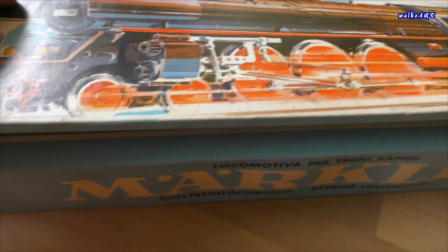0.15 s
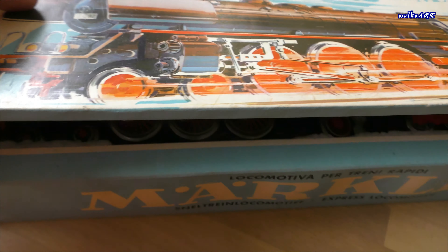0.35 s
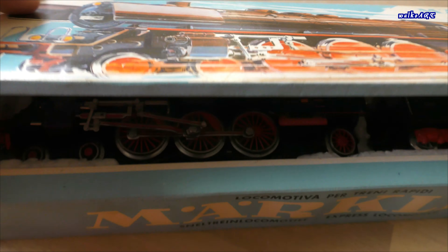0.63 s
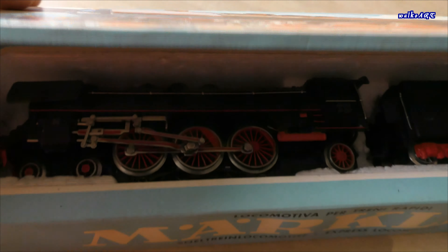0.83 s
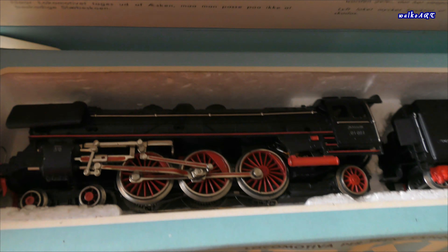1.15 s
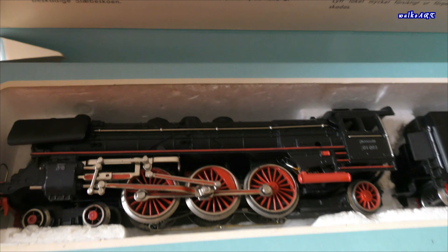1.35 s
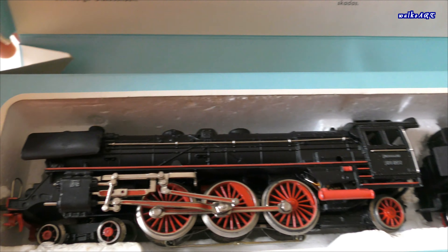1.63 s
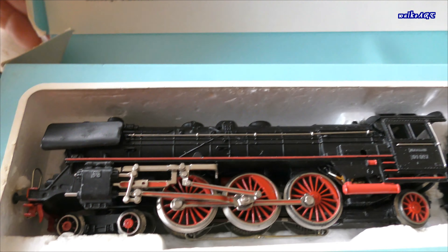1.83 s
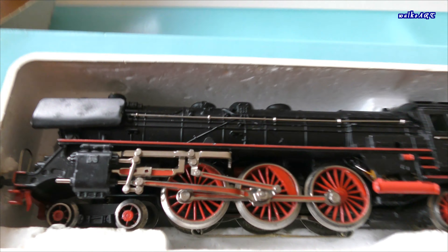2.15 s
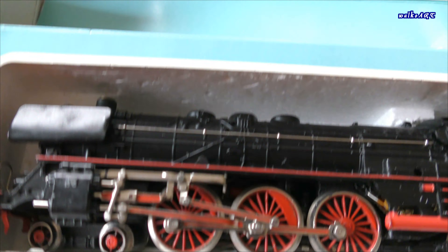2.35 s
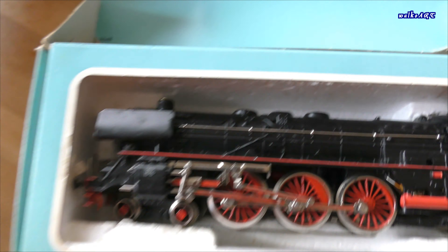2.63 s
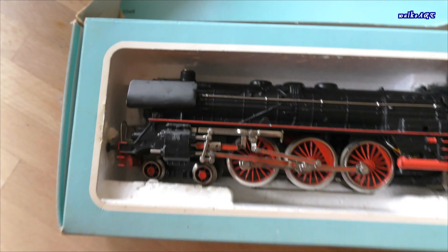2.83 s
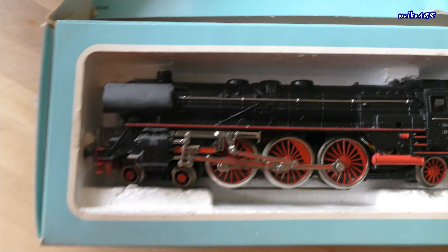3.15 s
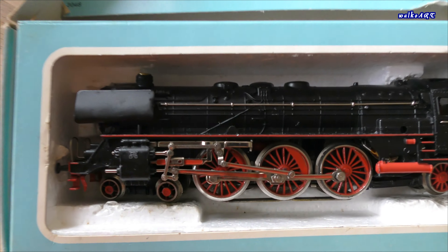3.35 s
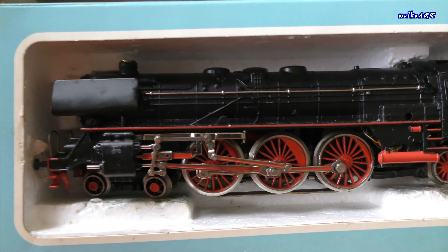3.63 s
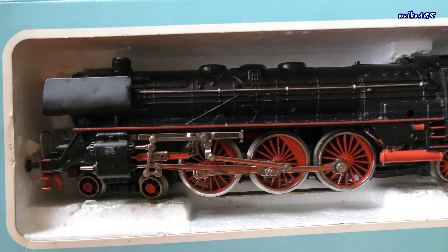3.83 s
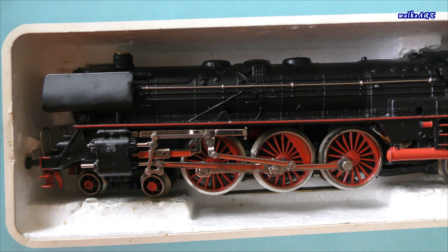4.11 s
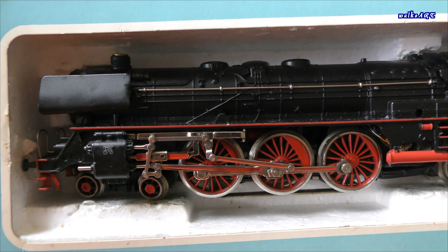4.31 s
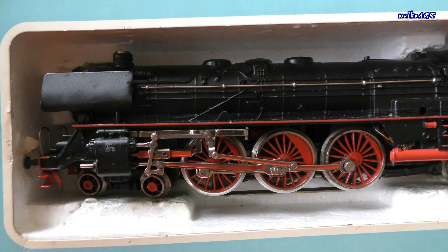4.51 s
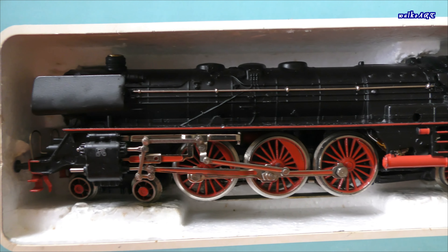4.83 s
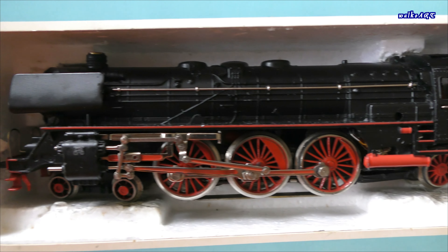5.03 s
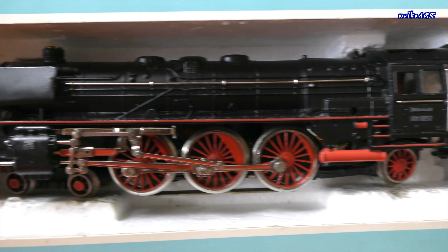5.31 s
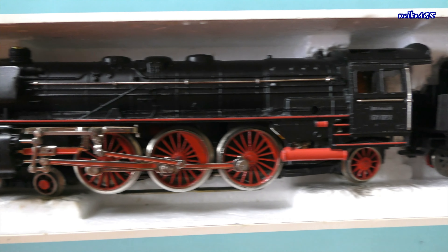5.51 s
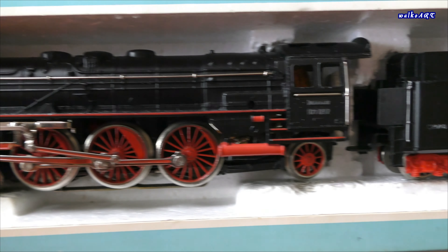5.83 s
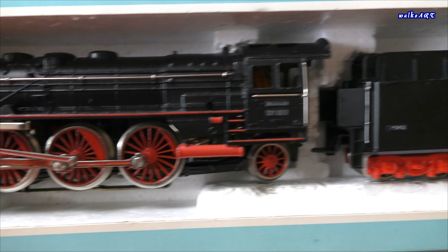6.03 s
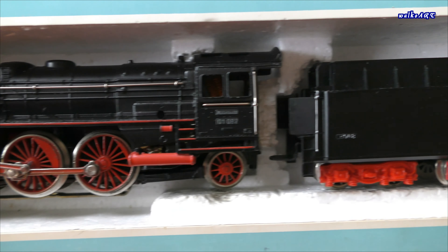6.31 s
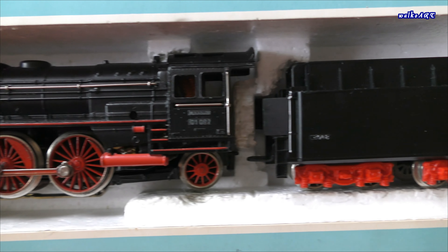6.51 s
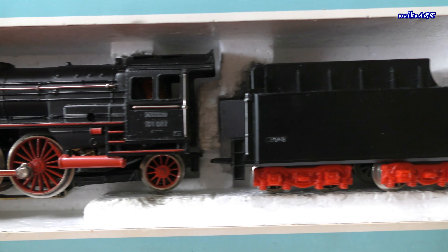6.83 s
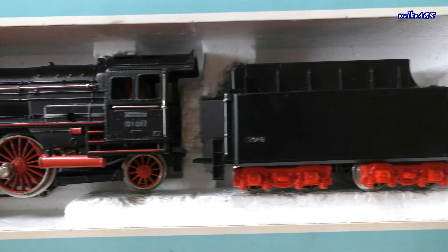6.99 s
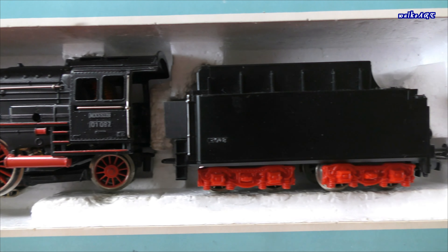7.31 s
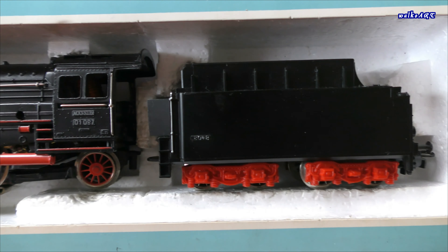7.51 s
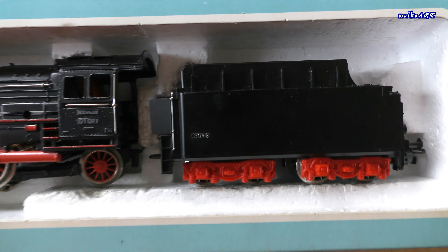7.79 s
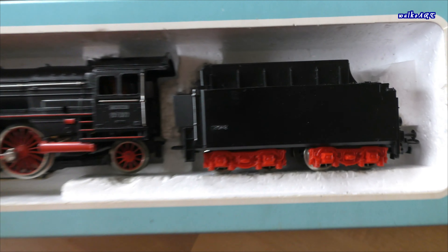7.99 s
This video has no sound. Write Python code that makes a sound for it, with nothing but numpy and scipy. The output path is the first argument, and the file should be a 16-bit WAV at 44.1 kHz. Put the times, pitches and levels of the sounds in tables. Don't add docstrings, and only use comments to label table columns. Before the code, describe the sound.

A cardboard lid rubs and rasps off its box, pops free with a sharp crack, scrapes, then light clicks and taps follow in a quiet room.

```python
import sys
import numpy as np
from scipy import signal
from scipy.fft import rfft, irfft
from scipy.io import wavfile
from scipy.ndimage import uniform_filter1d

SR = 44100
rng = np.random.default_rng(int(sys.argv[2]) if len(sys.argv) > 2 else 0)


def store_wav(level_fs):
    pcm = np.round(np.clip(np.atleast_2d(level_fs), -1, 1) * 32767)
    wavfile.write(sys.argv[1], SR, pcm.T.astype(np.int16))


def magnitude_from_level(level_db):
    exponent = np.asarray(level_db, float) / 20
    return 10 ** exponent


N = 359415
HZ = np.fft.rfftfreq(512, 1 / SR)
FRAMES = np.arange(N // 128 + 5) * 128 / SR

# f/Hz, level/dB per Hz
BOARD_SPECTRUM = [(260, -38), (450, 11.5), (478, 3), (530, -2), (589, -10), (1020, 1), (1440, -2),
                  (1600, -3), (2040, -12.5), (3230, -9), (4300, -13.5), (7030, -13.5), (8670, -14.5),
                  (13600, -14.5), (16000, -14)]
# f/Hz, left-right likeness
NEAR_LIKENESS = [(60, 0.45), (180, 0.17), (550, 0.91), (1650, 0.57), (4970, 0.49), (15000, 0.69)]
# t/s, pressure level/dB, speed as rasp over rub level/dB
NUDGE = [
    (0.0, -58.5, -16.5),
    (.196, -46.5, -6),
    (.254, -56, -12.5),
    (.3, -59.5, -11.5),
]
LIFT = [
    (.512, -58.5, -14),
    (.626, -55.5, -9.5),
    (.86, -56.5, -6),
    (1.03, -49, -1),
    (1.1, -52.5, 2),
    (1.138, -47, -3),
    (1.2, -48.5, 4.5),
    (1.255, -50.5, -2),
]
STRAIN = [
    (1.283, -46, 8),
    (1.31, -40, -4),
    (1.345, -53.5, 7),
    (1.372, -59.5, 6),
]
SWING = [
    (1.39, -44, -6),
    (1.43, -51.5, -2.5),
    (1.55, -55.5, 3.5),
    (1.776, -52.5, -7.5),
    (1.88, -47, -3),
    (2.03, -51.5, -4.5),
    (2.134, -51.5, 4.5),
    (2.31, -45.5, -10),
    (2.4, -44, -12.5),
]
REST = [
    (2.46, -57, -1),
    (2.6, -60, -11.5),
    (2.66, -56, -9),
    (2.97, -63, -6.5),
    (3.04, -60.5, -3),
    (3.3, -65.5, -9.5),
    (3.55, -61, -14),
    (3.85, -70, -9),
    (4.2, -60, -22),
]
# t/s, half length/s, level/dB
BRUSHES = [
    (0.276, 0.0082, -48.5),
    (0.879, 0.0062, -47.5),
    (2, .015, -53),
    (1.885, .05, -63),
    (3.01, 0.031, -62),
    (4.144, 0.022, -59.5),
    (5.141, 0.015, -57),
    (6.16, 0.038, -56),
    (7.166, 0.067, -62.5),
]


def slide():
    z = pair(NEAR_LIKENESS, 3.2)
    t = FRAMES[:z.shape[2]]
    rub_db, speed_db = columns([NUDGE, LIFT, STRAIN, SWING, REST], t)
    press, quick = rub_db + 50, speed_db + 5
    rasp_db = rub_db + speed_db
    fizz_db = -58.5 + 0.63 * press + 0.95 * quick
    flap_hz = 2270 - 8 * press + 13 * quick
    board_db = read(BOARD_SPECTRUM, HZ)

    flap = .6 + 2.26 / (1 + ((HZ[:, None] - flap_hz) / 240) ** 2)
    flap = flap * shaped(board_db, 443, 3940)
    flap = flap * np.sqrt(np.mean(shaped(board_db, 500, 3200) ** 2) / np.mean(flap ** 2, 0))
    rim_db = 20 * np.log10(1 + 0.76 / (1 + ((HZ - 4280) / 410) ** 2))
    rasp = shaped(board_db + rim_db, 1650, 5500)
    fizz = shaped(board_db, 5200, 14000)
    colour = np.sqrt((flap * magnitude_from_level(rub_db)) ** 2 + (rasp * magnitude_from_level(rasp_db)) ** 2 + (fizz * magnitude_from_level(fizz_db)) ** 2)

    fade = np.clip((REST[-1][0] - t) / 0.33, 0, 1)
    brush = sum(magnitude_from_level(db) * np.exp(-((t - s) / half) ** 2) for s, half, db in BRUSHES)
    colour = np.hypot(colour * fade, brush * shaped(board_db, 1260, 3900))
    judder = patches((1, len(t)), 1, 3)
    colour = colour * magnitude_from_level(0.79 * patches(z[0].shape, 8, 12) + 1.16 * judder)
    return sound(z * colour * magnitude_from_level(np.array([.4, -.4]))[:, None, None])


# f/Hz, level/dB, decay t60/s
MAIN_MODES = [(2097, 4.5, 0.024), (1776, -1.5, 0.022), (2490, -5, 0.018), (2770, -14.5, 0.015)]
LOW_MODES = [(944, -0.5, 0.038), (1214, 0.5, 0.028), (1082, -6, 0.024), (1380, -3.5, 0.023)]
UPPER_MODES = [(4165, -4.5, 0.012), (4810, 4, 0.0048), (3236, 0.5, 0.006), (5980, -1.5, 0.0041)]
# f/Hz, level/dB, decay t60/s
WALL_MODES = [(480, 0, 0.052), (453, -6.5, 0.026)]
# t/s, strength level/dB, dullness (low over main modes)/dB,
# sharpness (upper modes)/dB, edge (tilt of upper modes)/dB per half octave
NICKS = [
    (0.2672, -38.5, -2, -3, 1),
    (0.5984, -58.5, 11, 13, -9),
    (0.6458, -56, 5, 8, 1),
    (0.6963, -59, -8, 18, 8),
    (0.8704, -56, 6, 15, 9),
]
SLIPS = [
    (1.1015, -54, -10, -5, 1),
    (1.1292, -31, -22, 2.5, -3),
    (1.142, -26.5, -32, -3, -6),
    (1.1725, -39, -15, 2, 1),
    (1.189, -43, -15, -3, 1),
    (1.196, -32, -14, -7, 1),
    (1.213, -33, -25, -11, -2),
    (1.257, -44, -20, -8, 1),
    (1.265, -33, -20, 0, -5),
    (1.687, -42, -14, -4, -4),
]
POPS = [
    (1.2827, -36, -6, -10, 0),
    (1.291, -25.5, -3, -4, 1),
    (1.2935, -18.5, -3.5, -4, -1),
    (1.3038, -26.5, 8, 0, -2),
    (1.319, -36, -8, -6, -1),
    (1.3425, -44, -35, 5, -3),
    (1.348, -34, -34, 4, 4),
    (1.875, -39, 1, -20, 1),
]
RELEASE = [
    (1.3875, -37, -12, 8, 1),
    (1.396, -44, -7, -7, 1),
    (1.3968, -15, 16, -5, 1),
    (1.399, -23, -3, -2.5, 1),
]
SCRAPES = [(2.171, -39, 10, -9, 1), (2.2177, -38.5, -1, -1, -4), (2.245, -38, -4, -3, 1),
           (2.2538, -30, -13, -16, 5), (2.264, -34, -3, -14, 3), (2.2709, -37, -1, -5, 6),
           (2.278, -39, -5, -8, 1), (2.287, -39, 10, -14, 1), (2.3, -42, 8, -16, 1),
           (2.3077, -42, -3, -12, 1), (2.316, -41, 3, 1, 3), (2.329, -38, -2, -14, 1),
           (2.353, -30.5, -16, -9, -3), (2.359, -35, -9, -13, 3), (2.365, -39, -8, -10, 1),
           (2.3686, -38, 9, -10, 2), (2.38, -35, -8, -14, 1), (2.388, -34, 11, -14, 1),
           (2.4012, -29, -4, -2.5, 1), (2.4079, -33.5, -5.5, 2, -6), (2.419, -52, 11, -9, 1),
           (2.432, -37, 5, -22, 1), (2.439, -33, 3, -20, -4), (2.4698, -36.5, -4.5, -7, -4),
           (2.4823, -40, 0, -12, -3)]
CLUSTER = [
    (2.642, -49, 10, -10, 1),
    (2.6605, -31, -9, -25, -4),
    (2.6738, -27.5, -8, -12, -2),
    (2.685, -33, -2, -10, -2),
    (2.6967, -36, 8, -3, -2),
    (2.728, -28, -6, -18, 11),
    (2.7585, -31, -7, -19, -2),
    (2.783, -58, 4, 3, 5),
]
RATTLE = [(3.131, -36.5, -4, -6.5, -6), (3.1571, -40.5, 16, -26, 1), (3.204, -33, 0.5, -1, -1),
          (3.21, -30.5, -6, -4.5, -7), (3.3555, -30, -5.5, -5, 14), (3.3824, -26.5, -3, -14, -4),
          (3.391, -33.5, -1, -2.5, 3), (3.445, -32.5, 3.5, -4.5, -3), (3.4495, -34, 1, -15, 1),
          (3.4548, -30, -9, -6, -8), (3.5, -29.5, 0.5, 1, -1), (3.512, -33, -2, -9, -2),
          (3.5239, -33.5, 0, 1, 11), (3.538, -41, 12, -7, 1), (3.5887, -28, -4, -7, -15),
          (3.676, -45, 16, -21, 1), (3.7366, -26.5, -6, -5, -14), (3.8034, -30.5, -4.5, -4, -7),
          (3.771, -60, 0, 3, 1), (3.8572, -30.5, 4, 2, 1)]
TOUCHES = [
    (4.132, -51, -6, -21, 5),
    (4.468, -40.5, 31, -11, 1),
    (5.2589, -31, 2.5, 5.5, 1),
    (5.2666, -38.5, -2.5, -2, -4),
]
TAPS = [
    (6.157, -35.5, -27, -0.5, -2),
    (6.16, -34.5, -2.5, -4, -2),
    (6.349, -47, 15.5, -4, -5),
    (6.3883, -30.5, -7.5, -5, -5),
    (6.396, -34, 2, 3.5, -1),
    (6.453, -36, -4.5, -3.5, -9),
    (6.734, -56.5, -1, 1, 3),
    (6.895, -46, 8, -20, 1),
]
CLICKS = [
    (7.0591, -32.5, 0, -1.5, -21),
    (7.0616, -30.5, -8, -9, -10),
    (7.1462, -45, 15, -7, -2),
    (7.157, -49, 10, -3, -3),
    (7.2416, -25, -5.5, -8, -5),
    (7.244, -25, -7, -3, -5),
    (7.2501, -33.5, -8, 0, 0),
    (7.254, -36, 13, -14, 1),
    (7.654, -37, 14, -11, -9),
]
# crack level/dB, crack growth with sharpness,
# pitch factors of main, low, upper modes, left-right level/dB of main, low, upper modes
RUN_VOICING = [
    (-2, 1, 1.13, 0.98, 0.98, 7, -1, 2),
    (3.5, 0.55, 1.19, 1.04, 1.17, -2, -1, -1),
    (4.5, 0.64, 1.06, 0.98, 0.84, -6, 2.5, -3),
    (3, 0.53, 1.37, 1.077, 0.94, 5, 4.5, 4),
    (-13.5, 0.19, 1, 1.016, 0.96, -6.5, -2.5, -4),
    (-9, 0.12, 0.97, 0.98, 0.97, -5.5, -2.5, -3),
    (-11, 0.71, 1.012, 1.012, 0.972, -5, -1, -4),
    (-18, .3, 0.955, 1, 0.98, -5, -1, -4),
    (-12.5, .3, 1.003, 0.94, 0.93, -4, -.5, -3.5),
    (-7.5, 0.9, 1, 1.05, 1.06, -2.5, 1, -2),
]
CRACK_EDGES = [7000, 6450, 7300, 6650, 6500, 6940, 6600, 9500, 7660, 7740]
THUD_LEVELS = [-7, -10, -6, -25, -12.5, -15, -16, -17, -9.5, -15.5]


def ticks():
    out, t = np.zeros((2, N)), np.arange(500) / SR
    runs = NICKS, SLIPS, POPS, RELEASE, SCRAPES, CLUSTER, RATTLE, TOUCHES, TAPS, CLICKS
    rows = []
    for run, voicing, crack_hz, thud_db in zip(runs, RUN_VOICING, CRACK_EDGES, THUD_LEVELS):
        rows += [row + (crack_hz, thud_db) + voicing for row in run]
    close = abs(np.diff([row[0] for row in rows], prepend=0, append=99)) < .009
    pair_db = np.where(close[:-1], -4.5, 4.5 * close[1:])
    chance = rng.standard_normal((len(rows), 1024))
    housing_top = signal.butter(6, 6200, fs=SR)
    burst = (1 - np.exp(-t / .0003)) * (np.exp(-t / .0011) + .24 * np.exp(-t / .004))

    for row, extra_db, c in zip(rows, pair_db, chance):
        s, db, dull, sharp, edge, crack_hz, thud_db, crack_db, growth, *voicing = row
        pitches, pans = voicing[:3], voicing[3:]
        detune, grit = c[:24].reshape(3, 4, 2), c[24:524]
        blow = np.diff(grit * burst)
        add(blow, 0, np.array([5.2, -5.2]))
        sides = magnitude_from_level(np.outer(pans, [.5, -.5]))[..., None]
        group_db = db - max(dull, 0), db + min(dull, 0), db + sharp
        upper = [(hz, d + 2 * edge * np.log2(hz / 4400), t60) for hz, d, t60 in UPPER_MODES]

        body = np.zeros((2, 3000))
        groups = MAIN_MODES, LOW_MODES, upper
        for level, side, modes, v, pitch in zip(group_db, sides, groups, detune, pitches):
            tuned = [(hz * pitch, d, t60) for hz, d, t60 in modes]
            add(body, 0, magnitude_from_level(level) * side * ring(tuned, v, blow))
        thud = ring(WALL_MODES, detune[0], np.diff(np.hanning(40)))
        add(body, 0, magnitude_from_level(db - abs(dull) / 2 + thud_db) * thud)
        body = signal.lfilter(*housing_top, body)

        bright = signal.butter(3, [crack_hz, 16000], "band", fs=SR)
        crack = c[524:] + .4 * np.outer([1, -1], grit)
        crack = signal.lfilter(*bright, crack * burst)
        crack_level = magnitude_from_level(db + crack_db + growth * sharp + extra_db)
        add(body, 0, crack_level * sides[-1] * crack / abs(crack).max())
        add(out, s, body)
    return out


# start t/s, end t/s, slip rate/(1/s), main, low and upper mode level/dB
CREAKS = [(1.233, 1.31, 1600, -50, -69, -43.5), (1.306, 1.337, 810, -44, -60, -48),
          (1.738, 2.26, 520, -58, -54.5, -48), (2.174, 2.37, 380, -63, -47.5, -49.5),
          (2.71, 2.727, 1500, -71, -47.5, -52.5), (0.714, 1.13, 220, -50, -56.5, -58.5),
          (1.105, 1.294, 290, -44, -58, -47), (1.305, 1.29, 900, -62, -68, -49),
          (1.391, 1.403, 1300, -36, -35, -29.5), (2.35, 2.408, 500, -54, -51.5, -45.5),
          (1.335, 1.35, 1300, -42.5, -63, -43)]


def creaks():
    t, out = np.arange(N) / SR, np.zeros(N)
    luck = rng.random(N)
    size = magnitude_from_level(2.65 * np.minimum(rng.exponential(1, N), 4)) * rng.choice([-1, 1], N)
    for start, end, rate, *group_db in CREAKS:
        progress = np.clip((t - start) / (end - start), 0, 1)
        strain = np.sqrt(np.clip(np.sin(np.pi * progress), 0, 1))
        pitch = 1.13 if start < 1.2 else 1
        body = np.zeros(3000)
        for db, modes, p in zip(group_db, (MAIN_MODES, LOW_MODES, UPPER_MODES), (pitch, 1, 1)):
            tuned = [(hz * p, d, t60) for hz, d, t60 in modes]
            add(body, 0, magnitude_from_level(db) * ring(tuned, np.zeros((4, 2)), [1, -1]))
        out += signal.oaconvolve(size * strain * (luck < rate / SR), body)[:N]
    return out * magnitude_from_level(np.array([[-1.5], [1.5]]))


# t/s, level/dB, pitch factor, ring factor
KNOCKS = [
    (0.265, -39, 1.3, 1.5),
    (1.29, -27.5, 1.33, 1.5),
    (1.305, -35.5, 0.88, 0.76),
    (1.3964, -18, 1.09, 0.43),
    (1.877, -36.5, 1.01, 1.4),
    (2.401, -63, 0.87, 0.54),
]
# f/Hz, level/dB, decay t60/s
LID_MODES = [(147, 3.5, 0.073), (195.3, -0.5, 0.088), (285, -2.5, 0.13), (350, 5.5, 0.037), (470, 3, 0.024),
             (645, -3, 0.11)]


def knocks():
    out, push = np.zeros(N), np.diff(np.hanning(125))
    chance = rng.standard_normal((len(KNOCKS), len(LID_MODES), 2))
    for (s, db, pitch, stretch), u in zip(KNOCKS, chance):
        tuned = [(hz * pitch, d, t60) for hz, d, t60 in LID_MODES]
        add(out, s, magnitude_from_level(db) * ring(tuned, u / 2, push, stretch))
    return out


def ring(modes, detune, blow, stretch=0.53):
    t = np.arange(0, 1.3 * stretch * max(m[2] for m in modes), 1 / SR)
    x = 0
    for k, ((hz, db, t60), (u, v)) in enumerate(zip(modes, detune)):
        decay = magnitude_from_level(db + 1.8 * u - 60 * t / (t60 * stretch))
        x = x + (-1) ** k * decay * np.sin(2 * np.pi * hz * (1 + 0.0097 * v) * t)
    x = signal.fftconvolve(x, blow)
    return x / abs(x).max()


# f/Hz, level/dB per Hz
HOLLOW_SPECTRUM = [(12, -18), (20, -27), (33, -5), (66, -18.5), (87, 2), (167, -3), (222, -7.5), (330, 3.5),
                   (359, 2.5), (464, -2.5), (600, -11), (780, -55), (1320, -120)]
# t/s, grip level/dB, hollow note f/Hz
HOLD = [(0.0, -58.5, 202), (.45, -58.5, 197), (1.25, -48, 244), (1.5, -54, 235), (2.1, -59, 264),
        (2.7, -53, 218), (3.3, -60.5, 190), (3.89, -58, 190), (4.4, -63, 185), (6.0, -65, 178),
        (8.15, -61.5, 184)]
# peak t/s, level/dB, hollow note f/Hz, swell/s, fade/s
GRIP_SHIFTS = [(0.269, -37.5, 282, 0.015, 0.036), (.65, -61, 185, 0.85, 0.97), (1.89, -49, 285, 0.49, 0.26),
               (2.031, -49.5, 198, 0.47, 0.87), (2.38, -43.5, 200, 0.86, 0.36),
               (3.03, -47.5, 170, 0.073, 0.41), (5.3, -56.5, 158, 0.71, 0.3), (5.71, -49, 163, 0.19, 0.28),
               (5.99, -63, 153, 0.1, 0.2), (6.17, -49, 210, 0.1, 0.2), (6.216, -46.5, 194, 0.088, 0.24),
               (6.275, -51, 189, 0.032, 0.12), (6.55, -54.5, 193, 0.8, 1), (7.2, -44.5, 203, 0.059, 0.23),
               (7.32, -48, 176, 0.1, 0.28), (7.7, -60.5, 238, 0.78, 0.93), (7.93, -53.5, 180, 0.61, 0.29)]
# peak t/s, level/dB, fade/s
PUSHES = [(0.0, -66, 0.13), (.22, -57.5, 0.42), (1.2, -68, 1.6), (2.25, -62, .4), (2.38, -54, 0.36),
          (4.79, -63, 0.4), (5.24, -59, 0.45), (6.2, -63, .38), (6.58, -61, 0.49), (6.74, -66, 1.3),
          (7.24, -58, 0.64), (7.83, -61, 0.45)]


def hand():
    hz, t = np.fft.rfftfreq(N, 1 / SR), np.arange(N) / SR
    mid, side = rfft(rng.standard_normal((2, N)))
    z = np.array([mid + .26 * side, mid - .26 * side])
    z = z * magnitude_from_level(read(HOLLOW_SPECTRUM, hz)) / (1 + (hz / 600) ** 8)
    deep = 1 / (1 + (hz / 65) ** 8)
    lumps = uniform_filter1d(rng.standard_normal(N), size=900)
    lumps = evened(uniform_filter1d(lumps, size=600))

    hold_db, hold_hz = columns([HOLD], t)
    shifts = [(swell(t, s, db, up, down), f) for s, db, f, up, down in GRIP_SHIFTS]
    shifts.append((magnitude_from_level(2 * hold_db), hold_hz))
    power = sum(p for p, f in shifts)
    hollow_db = 10 * np.log10(power)
    note_hz = sum(p * f for p, f in shifts) / power

    push = sum(swell(t, s, db, 0.18, down) for s, db, down in PUSHES)
    push = np.sqrt(magnitude_from_level(2 * -74.5) + push)
    pushes = evened(irfft((z + 0.2 * (z - z[::-1])) * deep, N))
    broad = irfft(z * (1 - deep), N)
    note = resonate(resonate(broad, note_hz, 154), note_hz, 156)
    note = note / np.sqrt(uniform_filter1d((note ** 2).mean(0), size=6000) + 1e-20)
    wash_db = -.45 * (hollow_db + 67)
    hollow = .7 * evened(broad) * magnitude_from_level(wash_db) + .75 * note
    return hollow * magnitude_from_level(hollow_db + 1.4 * lumps) + pushes * push


def swell(t, s, db, swell_s, fade_s):
    return magnitude_from_level(2 * (db - 36 * np.maximum((s - t) / swell_s, (t - s) / fade_s)))


def resonate(x, hz, width):
    turn = np.exp(2j * np.pi * np.cumsum(hz) / SR)
    r = np.exp(-np.pi * width / SR)
    return 2 * (turn * signal.lfilter([1 - r], [1, -r], x / turn)).real


# f/Hz, decay t60/s
ROOM_DECAY = [(300, 0.23), (1200, 0.24), (2000, 0.19), (2900, 0.2), (6000, 0.028), (12000, 0.11)]


def room(x):
    taps = np.zeros((2, SR // 2))
    at = np.arange(120, SR // 2 - 20, 20)
    at = at + rng.integers(0, 20, (2, (SR // 2 - 121) // 20))
    np.put_along_axis(taps, at, rng.choice([-1., 1.], at.shape), 1)
    hz, t, z = signal.stft(taps, SR, nperseg=256)
    decay = magnitude_from_level(-60 * t / read(ROOM_DECAY, hz)[:, None])
    tail = signal.istft(z * decay, SR, nperseg=256)[1]
    tail = np.array([tail[0] + 0.88 * tail[1], tail[0] - 0.16 * tail[1]])
    return signal.fftconvolve(x.mean(0)[None], tail / np.linalg.norm(tail[0]), axes=1)[:, :N]


# f/Hz, level/dB per Hz
AIR_SPECTRUM = [(260, -13), (450, -2.5), (598, -71), (715, 0), (868, -34), (1020, -4), (1360, -4.5),
                (1440, -6), (1890, -7.5), (2230, -8.5), (2790, -4), (3640, -14.5), (6830, -27.5),
                (14400, -13), (16000, -10.5)]
# f/Hz, width/Hz, level/dB
FAN_HUMPS = [(697, 9, -79), (950, 4, -81), (1945, 33, -69.5), (2746, 12, -68)]
# f/Hz, left-right likeness
AIR_LIKENESS = [(60, 0.5), (180, 0.048), (550, 0.014), (1650, 0.074), (4970, 0.04), (7400, 0.3),
                (10500, 0.29), (15000, 0.078)]


def air():
    z = pair(AIR_LIKENESS, 0)
    humps = 0
    for f, w, db in FAN_HUMPS:
        humps = humps + magnitude_from_level(db) / np.sqrt(w * (1 + (2 * (HZ - f) / w) ** 2) / SR * np.pi)
    hiss = magnitude_from_level(-62) * shaped(read(AIR_SPECTRUM, HZ), 220, 13100)
    centre = z.mean(0)
    fan = (np.hypot(hiss, humps[:, None]) - hiss) * (centre + .12 * (z - centre))
    return sound((z * hiss + fan) * magnitude_from_level(.9 * patches(z[0].shape, 6, 25)))


def evened(x):
    return x / np.sqrt(np.mean(x ** 2) + 1e-20)


def read(points, hz):
    f, value = np.transpose(points)
    return np.interp(np.log(hz + 1), np.log(f + 1), value)


def columns(tables, t):
    s, *values = np.vstack(tables).T
    return [np.interp(t, s, v) for v in values]


def pair(likeness, grit_db):
    a, b = rng.standard_normal((2, N)) * magnitude_from_level(grit_db * np.minimum(rng.exponential(1, N), 5))
    a, b = signal.stft([evened(a), evened(b)], nperseg=512, noverlap=384)[2]
    same = np.sqrt(np.clip(read(likeness, HZ), 0, 1)[:, None])
    mid, side = a * np.sqrt(.5 + same / 2), b * np.sqrt(.5 - same / 2)
    return np.array([mid + side, mid - side])


def sound(z):
    return signal.istft(z, nperseg=512, noverlap=384)[1][:, :N]


def patches(shape, wide, long):
    z = uniform_filter1d(rng.standard_normal(shape), size=wide, axis=0)
    return evened(uniform_filter1d(z, size=long, axis=1))


def shaped(db, lo_hz, hi_hz):
    edge = 1 / np.sqrt((1 + (lo_hz / (HZ + 1)) ** 10) * (1 + (HZ / hi_hz) ** 10))
    return evened(magnitude_from_level(db) * edge)[:, None]


def add(mix, s, part):
    piece = mix[..., round(s * SR):][..., :part.shape[-1]]
    piece += part[..., :piece.shape[-1]]


def scene():
    steady = slide() + hand() + air()
    blows = ticks() + knocks() + creaks()
    return blows + magnitude_from_level(-11) * room(blows) + steady


def low_pass(x):
    return signal.sosfilt(signal.butter(12, 16650, fs=SR, output="sos"), x)


def record(dry):
    edge = signal.firwin(901, 15730, window=("kaiser", 4), fs=SR)
    mix = signal.oaconvolve(dry, edge[None], "same")
    return low_pass(mix)


dry = scene()
out = record(dry)
store_wav(out)
```